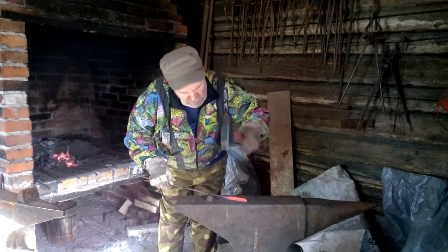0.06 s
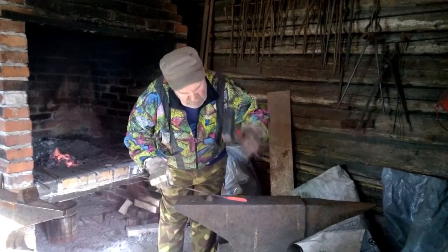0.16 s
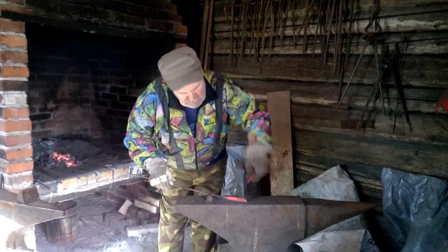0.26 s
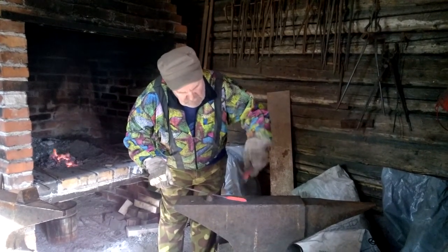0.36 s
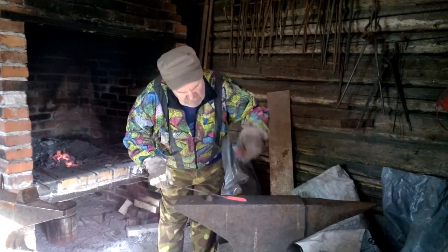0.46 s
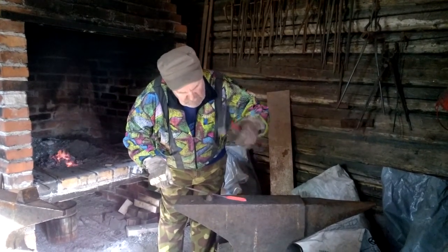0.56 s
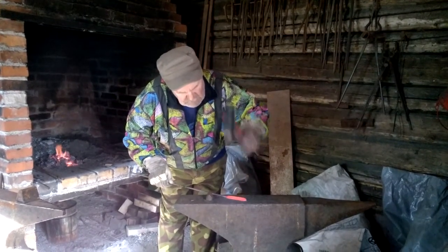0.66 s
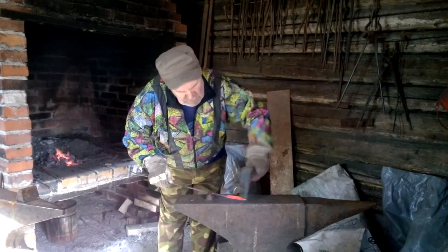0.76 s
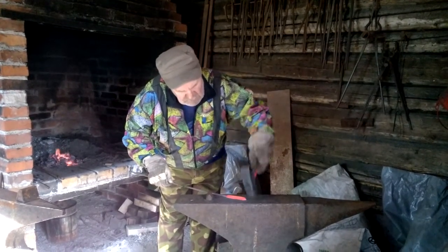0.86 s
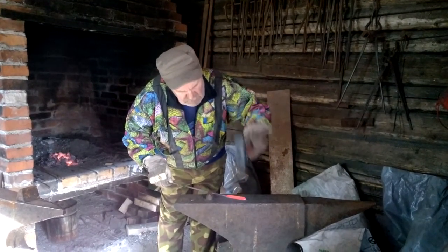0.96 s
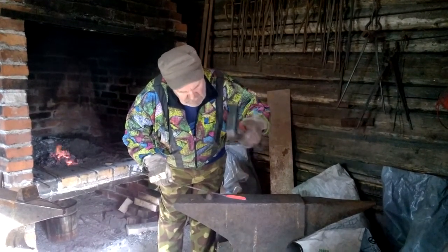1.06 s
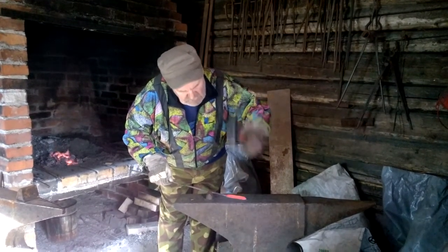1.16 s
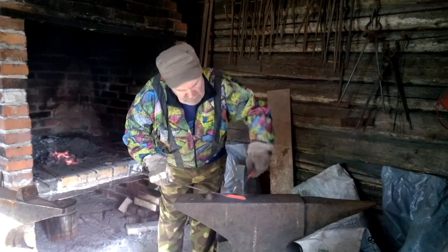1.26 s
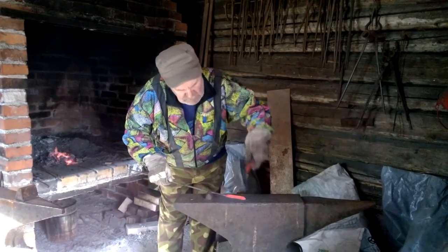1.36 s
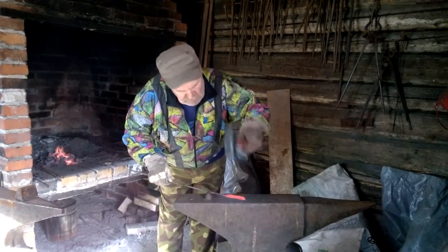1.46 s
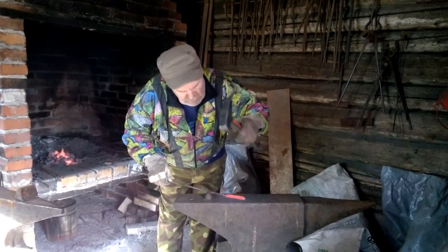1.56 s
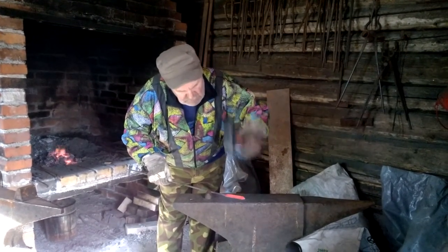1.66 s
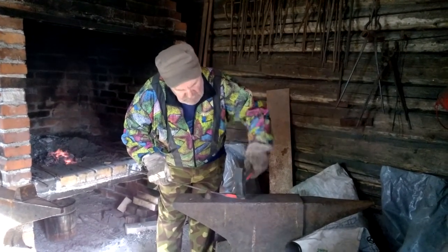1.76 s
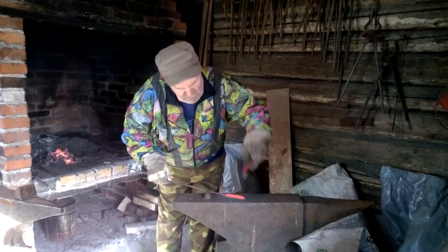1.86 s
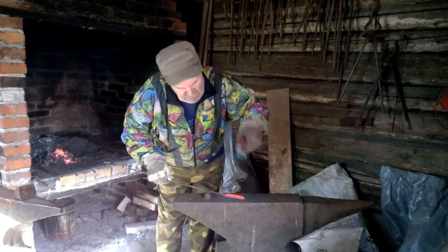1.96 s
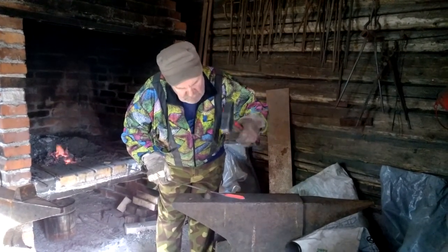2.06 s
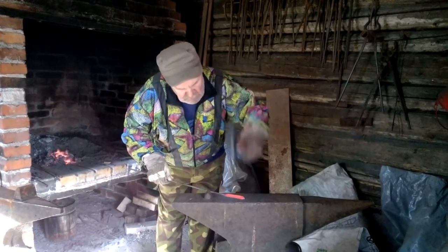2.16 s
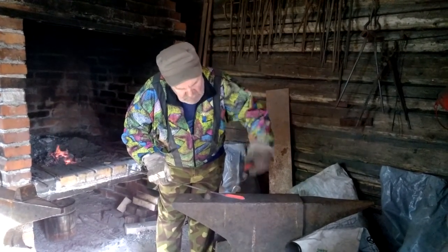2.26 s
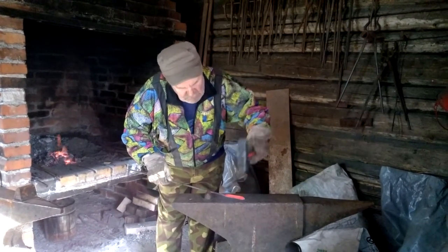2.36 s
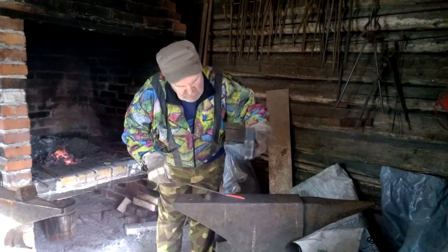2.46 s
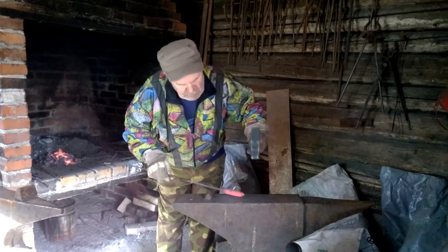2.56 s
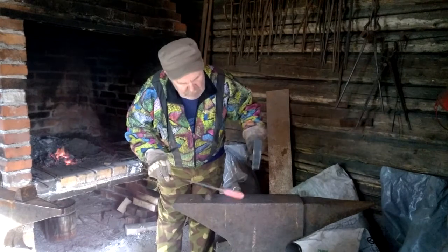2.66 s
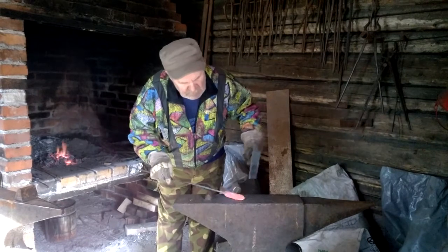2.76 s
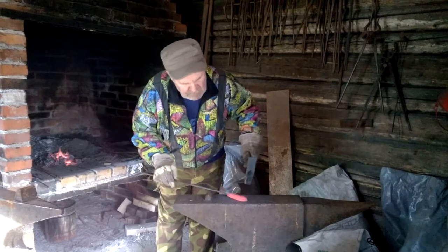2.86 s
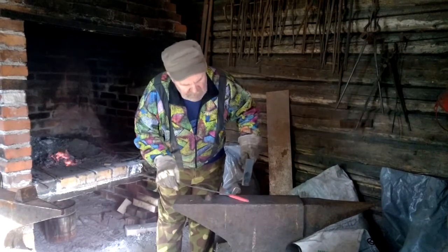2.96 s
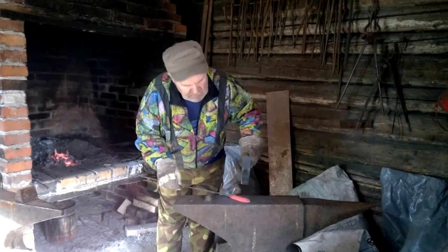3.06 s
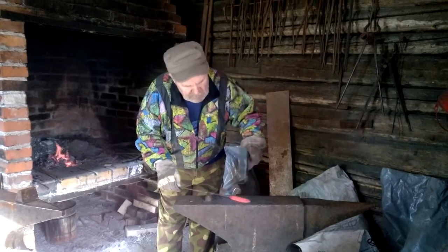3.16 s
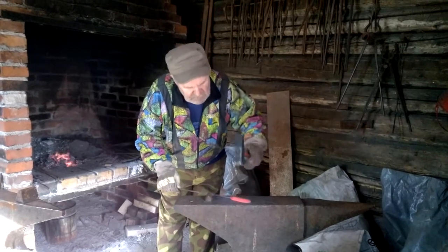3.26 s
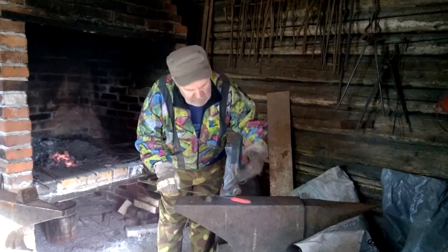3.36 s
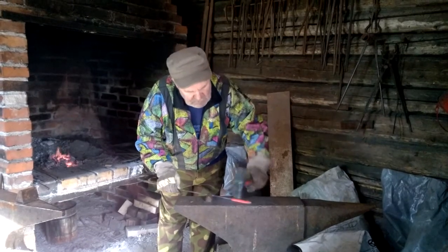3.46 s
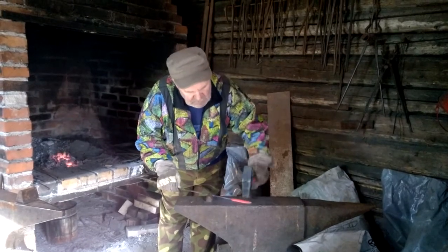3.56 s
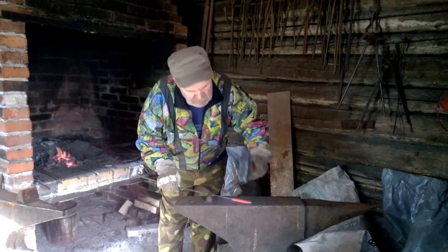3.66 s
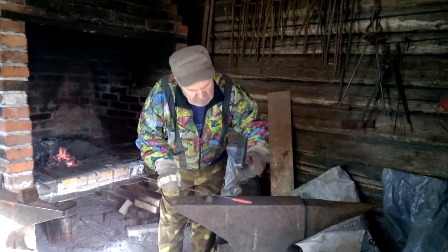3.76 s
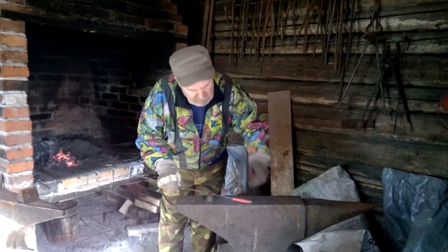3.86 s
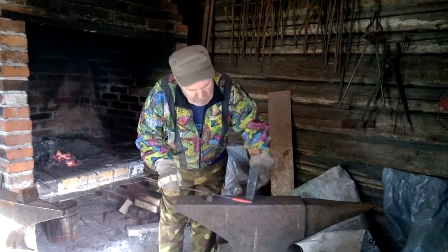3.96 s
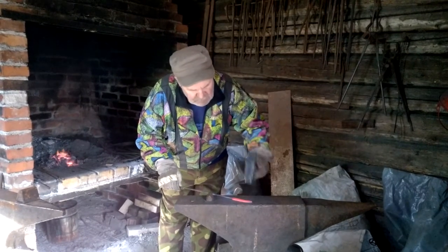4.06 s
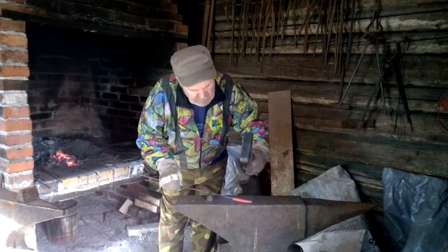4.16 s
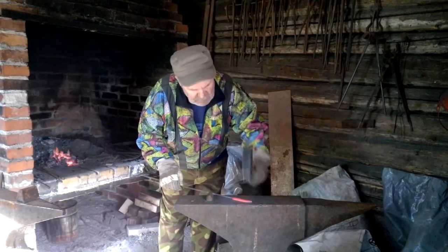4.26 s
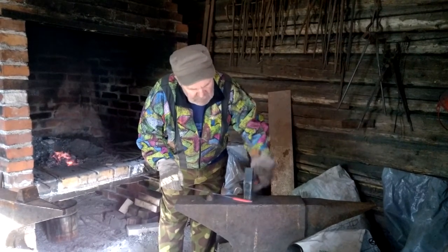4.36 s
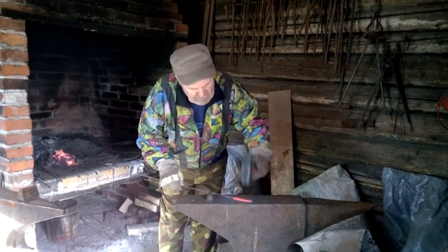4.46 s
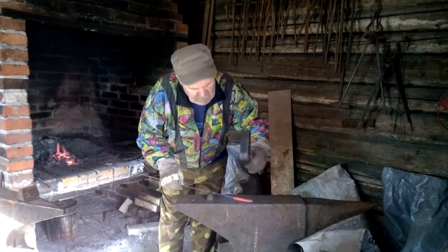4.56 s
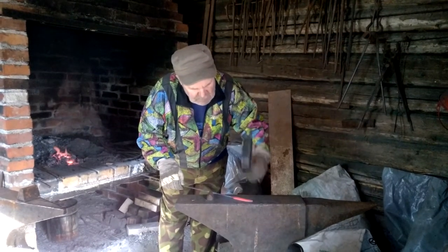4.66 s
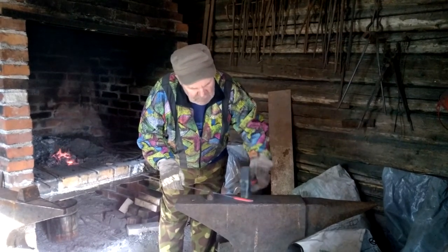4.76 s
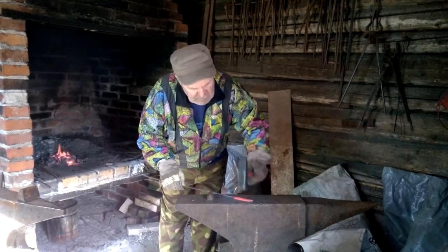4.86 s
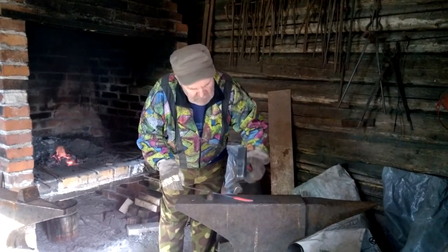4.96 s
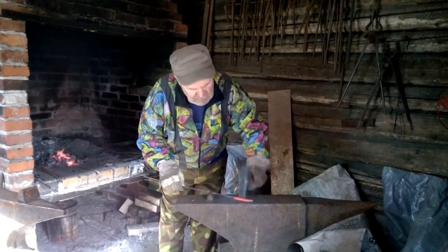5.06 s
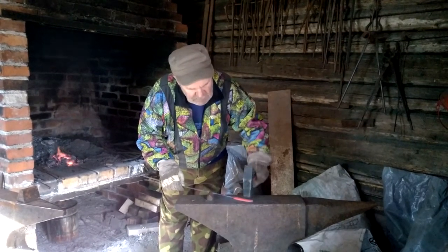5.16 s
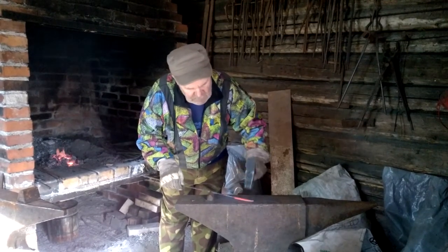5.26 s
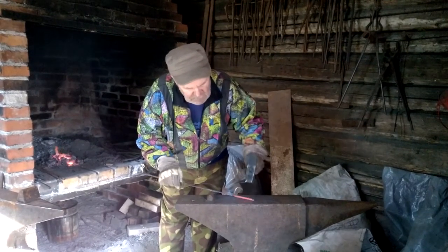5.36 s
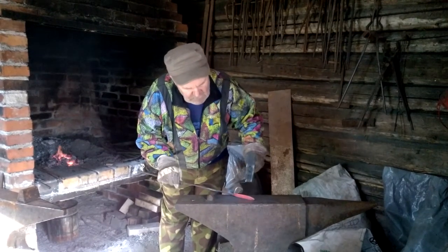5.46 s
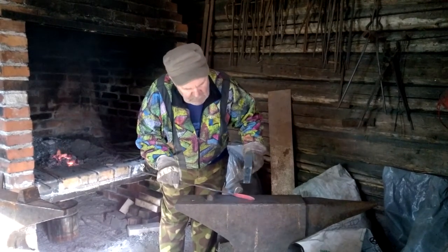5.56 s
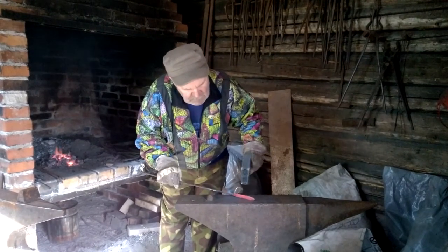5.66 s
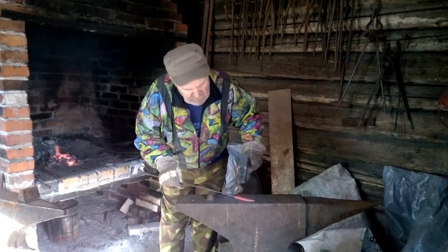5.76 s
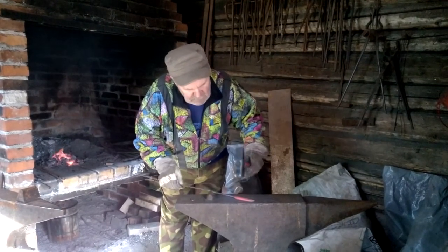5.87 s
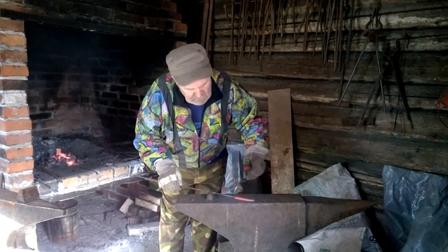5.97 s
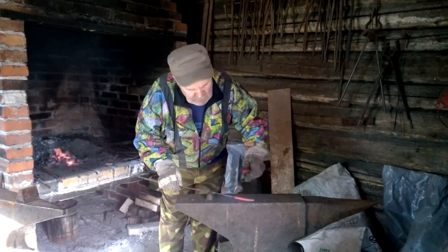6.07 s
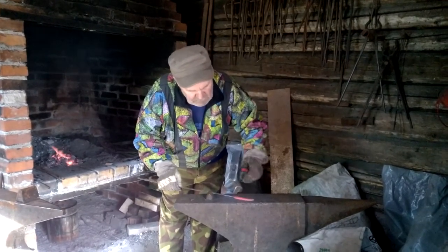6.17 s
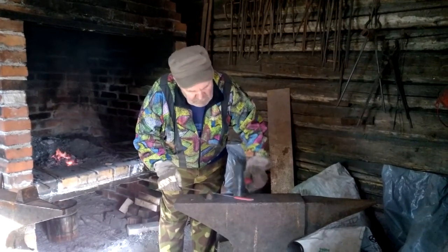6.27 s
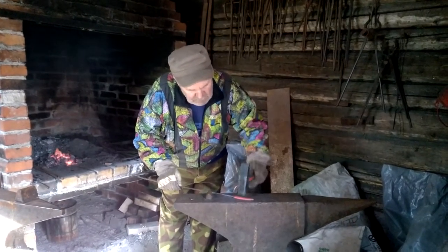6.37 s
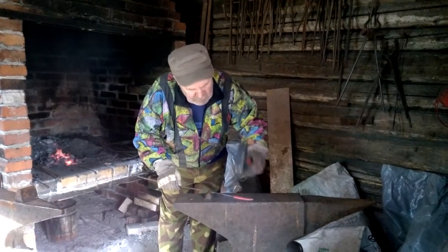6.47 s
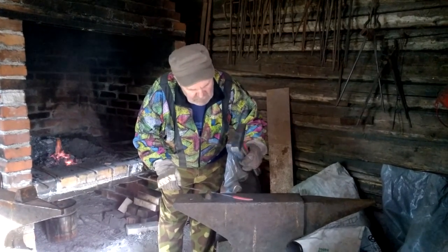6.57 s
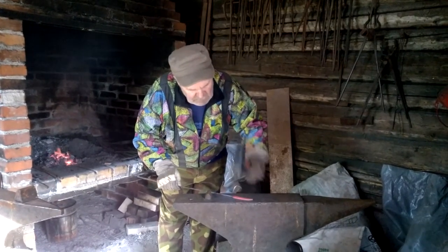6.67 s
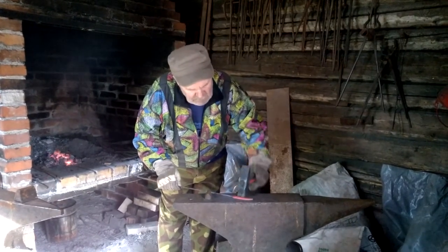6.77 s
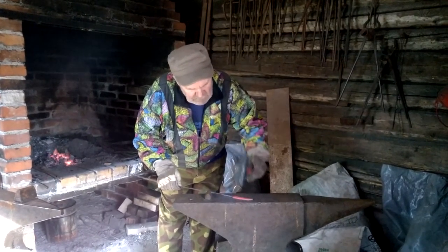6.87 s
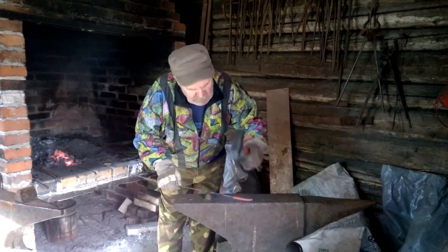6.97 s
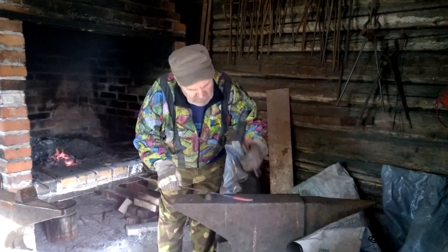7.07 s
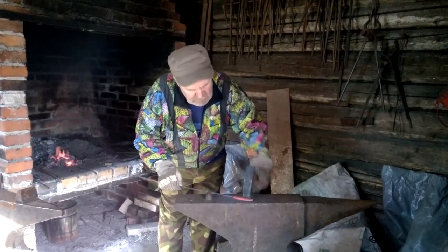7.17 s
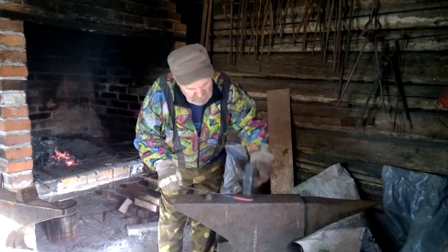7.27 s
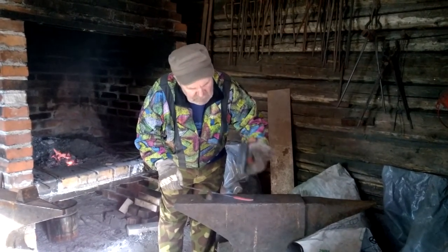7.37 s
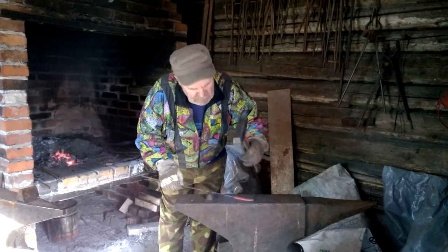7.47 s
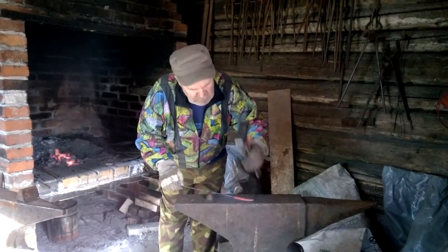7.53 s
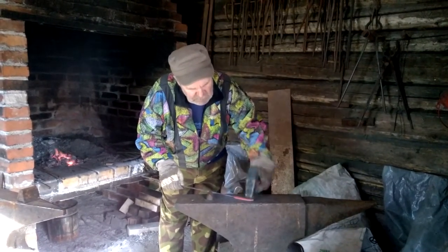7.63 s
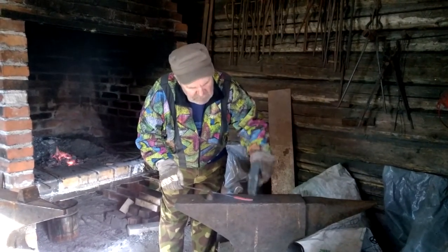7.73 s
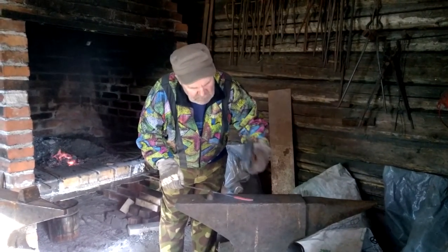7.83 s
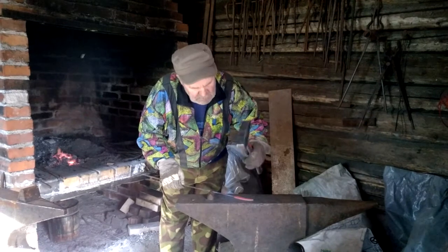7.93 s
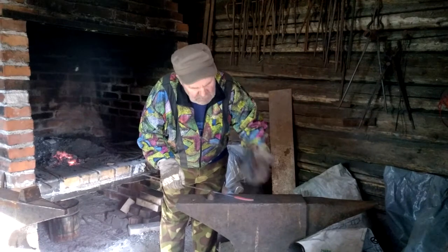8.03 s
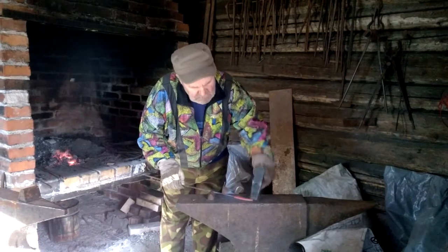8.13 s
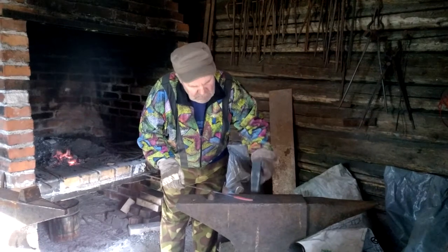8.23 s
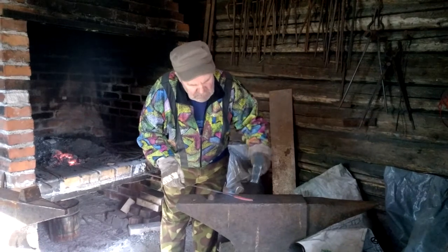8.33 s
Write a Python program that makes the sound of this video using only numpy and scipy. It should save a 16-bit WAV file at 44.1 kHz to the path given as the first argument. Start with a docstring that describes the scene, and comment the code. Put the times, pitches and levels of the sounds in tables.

```python
"""A forge murmurs low in a log-walled smithy, shaped noise with a faint rustle, while a hand hammer
forges hot steel on an anvil. A run of seven blows comes first, and something heavy lands on the floor
during it; then light ticks of metal, a run of five with a bounce onto the bare anvil after its first
blow, one more tick and a run of four. Each blow is a knock, echoing noise, a thud of the stump and the
decaying modes of anvil and hammer head. Two microphone ports hear it all through a limiter."""
import sys
import numpy as np
from scipy import signal
from scipy.fft import rfft, irfft
from scipy.io import wavfile
from scipy.ndimage import uniform_filter1d

SR = 44100
rng = np.random.default_rng(int(sys.argv[2]) if len(sys.argv) > 2 else 0)


def digitize_waveform(pressure):
    """Quantize a signal to 16-bit integers and store it at the path in sys.argv[1].

    Rows of a 2-D input are taken as channels; values are limited to [-1, 1].
    """
    field = np.atleast_2d(pressure).T
    bounded = np.clip(field, -1, 1)
    quanta = np.round(bounded * 32767).astype(np.int16)
    wavfile.write(sys.argv[1], SR, quanta)


N = 370440


def gain_of(db):
    """Turns dB into a gain on amplitude."""
    return 10 ** (np.asarray(db) / 20)


def evened(x):
    """Scales to rms 1."""
    return x / np.sqrt(np.mean(x ** 2) + 1e-20)


def read(points, hz):
    """Reads a table of (f/Hz, value) along log frequency."""
    f, value = np.transpose(points)
    return np.interp(np.log(hz + 1), np.log(f + 1), value)


def add(mix, s, sound):
    """Adds a sound at a time in s; what lies before zero is dropped."""
    at = round(s * SR)
    part = mix[:, max(at, 0):at + sound.shape[1]]
    part += sound[:, max(-at, 0):][:, :part.shape[1]]


# how alike diffuse sound is at the two ports: f/Hz, left-right likeness (0..1)
LIKENESS = [(60, 0.9), (180, 0.95), (550, 0.76), (1650, 0.14), (4970, 0.085), (15000, 0.023)]


def noise(size, colour_db):
    """Noise for two ports, sharing more of its sound in the bass, shaped by a function of Hz; rms 1."""
    hz = np.fft.rfftfreq(size, 1 / SR)
    left, other = rfft(rng.standard_normal((2, size)))
    same = np.clip(read(LIKENESS, hz), 0, 1)
    right = same * left + np.sqrt(1 - same ** 2) * other
    return evened(irfft(np.array([left, right]) * gain_of(colour_db(hz)), size))


# decay of the noisy sounds' tails, shortest in the top treble, before each sound's own stretch: f/Hz, t60/s
TAIL_DECAY = [(60, 0.38), (200, 0.21), (600, 0.28), (2000, 0.24), (5000, 0.18), (9000, 0.19), (12500, 0.13),
              (15500, 0.11)]
# how slowly the echoes fill in: f/Hz, time constant/s
ECHO_BUILD = [(60, 0.033), (300, 0.044), (1500, 0.0023), (6000, 0.0015)]


def echoes(x, stretch, edge_db):
    """Shapes steady noise into the sharp edge of a contact and its echoes, which fill in and die band by band."""
    hz, t, z = signal.stft(x, SR, nperseg=256, noverlap=192)
    fill = 1 - np.exp(-(t + 0.0073) / read(ECHO_BUILD, hz)[:, None])
    t60 = np.maximum(stretch * read(TAIL_DECAY, hz), .02)[:, None]
    # the end of the tail falls quicker than its start
    fade_db = -60 * (t / t60) ** 1.199
    tail = signal.istft(z * fill * gain_of(fade_db), SR, nperseg=256, noverlap=192)[1][:, :x.shape[1]]
    # the direct edge carries little bass and meets both ports alike
    bright = uniform_filter1d(np.diff(x.mean(0), prepend=0), size=3)
    edge = bright * np.exp(-np.arange(x.shape[1]) / SR / 0.0012)
    return tail + gain_of(edge_db) * edge


def ring(hz, db, t60, pan_db, lead, rise, turn):
    """One decaying mode, reaching the two ports with its own balance and phase; turn is its start in cycles."""
    t = np.arange(round(min(1.4, 1.5 * t60) * SR)) / SR
    side = np.array([[.5], [-.5]])
    out = np.zeros((2, round(1.4 * SR)))
    tone = np.sqrt(2) * np.sin(2 * np.pi * (hz * t + turn) + side * lead)
    fade = gain_of(db + side * pan_db - 60 * t / t60)
    add(out, 0, tone * fade * (1 - np.exp(-t / rise)))
    return out


# spectrum of the fire's murmur: f/Hz, relative level/dB per Hz
FORGE_COLOUR = [(15, -32), (25, -1.5), (80, -5.5), (141, -10), (175, -13), (591, -26.5), (1100, -35.5),
                (1560, -28.5), (1790, -53.5), (3820, -38.5), (16000, -60.5)]
FORGE_DB = -58
# how the faint rustle comes and goes: t/s, level/dB
RUSTLE_LEVEL = [(0, -73), (3.301, -85.5), (3.6, -77), (3.749, -68), (3.9, -67.5), (4.002, -83), (8.4, -68)]
# spectrum of the rustle: f/Hz, relative level/dB per Hz
RUSTLE_COLOUR = [(150, -21.5), (330, -2.5), (1000, 6), (3000, -8.5), (6000, -34.5)]


def forge():
    """The fire's low murmur is bass-heavy noise of slowly wandering level; a rustle passes over it."""
    smooth = uniform_filter1d(rng.standard_normal(N), size=2500)
    lumps = evened(uniform_filter1d(smooth, size=2500))
    murmur = gain_of(FORGE_DB + 0.5 * lumps) * noise(N, lambda hz: read(FORGE_COLOUR, hz))
    rustle_db = np.interp(np.arange(N) / SR, *np.transpose(RUSTLE_LEVEL))
    rustle = noise(N, lambda hz: read(RUSTLE_COLOUR, hz) - 40 * (hz > 8000))
    return murmur + gain_of(rustle_db) * rustle


# spectrum of the floor's rumble: f/Hz, relative level/dB per Hz
FLOOR_COLOUR = [(18, -31.5), (30, -20), (81, 1), (193, -13), (240, -16.5), (400, -24), (700, -30.5),
                (1300, -42.5), (1690, -76.5), (2860, -120)]


def bump(db):
    """A heavy landing gives the floorboards a fast-dying low push, and they rumble."""
    t = np.arange(30000) / SR
    push = -np.sin(2 * np.pi * 55 * t) ** 3 * np.exp(-t / 0.028)
    rumble = echoes(noise(30000, lambda hz: read(FLOOR_COLOUR, hz)), stretch=1.8, edge_db=-9.0)
    rumble = rumble * (1 - np.exp(-(t / .004) ** 2))  # soft start
    return gain_of(db + 7.5) * push + gain_of(db + 1.0) * rumble


# spectrum of a light contact: f/Hz, relative level/dB per Hz
TOUCH_COLOUR = [(700, -12), (1200, 0), (2500, 1), (5500, 3), (9000, -6.5), (13500, -7), (15000, -28)]
# modes of the tongs: f/Hz, relative level/dB, t60/s
TONGS_MODES = [(2757, -8, .2), (5150, 0, .07), (6450, 0, .08), (9227, -8, .1)]


def tick(db):
    """A light touch of metal: a small click, the tongs' short ring and the echoes."""
    out = sum(ring(hz, db + ring_db - 5, t60, 0, 0, rise=.001, turn=rng.random())
              for hz, ring_db, t60 in TONGS_MODES)
    click = echoes(noise(11025, lambda hz: read(TOUCH_COLOUR, hz)), stretch=0.87, edge_db=7)
    add(out, 0, gain_of(db - 0.5) * click)
    return out


# modes of the wooden stump: f/Hz, relative level/dB, t60/s
STUMP_MODES = [(66.5, -9.5, 0.23), (309.3, -3.5, 0.28), (359.3, -6, 0.27), (728, -9.5, .3),
               (814, -10, 0.28)]


def stump_thud(force_db):
    """The stump under the anvil thuds in a few low, heavily damped modes."""
    return sum(ring(hz, db - 22.5 + force_db, t60, 0, 0, rise=0.0031, turn=rng.random())
               for hz, db, t60 in STUMP_MODES)


# anvil modes, one list a family that rings together:
# f/Hz, relative level/dB, t60/s, left-right balance/dB, left's phase lead/rad
ANVIL_FAMILIES = [
    [(1542, 4, 1.0, -2.5, -1.0)],
    [(1422, 4, .78, 3, -.2)],
    [(1631.5, 0, .65, -8, -1.5)],
    [(2757, 4, .5, -13, .6)],
    [(2050, 5.5, .2, -1, 1.9), (2061, 2.5, .39, 3, -2.65)],
    [(5341, 4, .245, -7, 0), (3896, -6, .25, 7, -1), (4085, -4, .2, 9, -2.2), (4220, 3, .215, 4, -1.1)],
    [(3598, 5, .2, 3, 1.8), (2955, -2, .27, 0, -2.9), (3538, -6, .2, 8, 2.7)],
    [(5375, 4, .225, -3, .5), (6538, -8, .18, 1, -1.2), (7309, -4, .19, 6, -2.7), (8042, -10, .19, -1, 0),
     (8614, -3, .225, 1, -.2), (8788, -6, .2, 2, -3)],
]
# how each anvil family answers a blow: level/dB, share of the ring (dB per dB), slope along the face
# (dB per step), slope across it (dB per step), further slope on the near side of the middle (dB per step along)
FAMILY_ANSWER = [(-14, 1, 0, 0, 0), (-23, 1, 10, 0, 0), (-27.5, .8, 5, -4, 2), (-28.5, .83, 6, 2, 7),
                 (-17.8, .71, 0, 6.9, 0), (-33.6, 1.17, 0, 14, 0), (-23, .98, 0, 10, 0),
                 (-26.5, 1.2, 2, 2.5, 1)]


def anvil_ring(out, ring_db, along, across, overtone_db):
    """The spot struck sets how strongly each family of anvil modes is driven."""
    families_db = [db + share * ring_db + a * along + b * across + c * min(along, 0)
                   for db, share, a, b, c in FAMILY_ANSWER]
    families_db[3] += overtone_db  # the bright overtone
    for family_db, modes in zip(families_db, ANVIL_FAMILIES):
        turn = rng.random()  # a family sets off in step, so its close pair always beats alike
        for k, (hz, db, *rest) in enumerate(modes):
            # the lesser modes of the larger families vary by chance from blow to blow
            chance_db = 1.5 * rng.standard_normal() * (k > 0 and len(modes) > 2)
            out += ring(hz, db + family_db + chance_db, *rest, rise=0.007, turn=turn)


# modes of the hammer head: f/Hz, relative level/dB, t60/s, balance/dB and lead/rad before each blow's swing
HEAD_MODES = [(11144, 5, .145, -1, 0), (9228, -9, .17, 4, -.9), (9423, -14, .24, 3, -2.1),
              (10323, -12, .23, -4, -2.8), (12840, -14, .15, 3, -2.7), (13018, -12, .16, -4, -.7)]


def head_ring(out, head_db):
    """The hammer head rings high, and turns as it rebounds, which shifts its balance and phase."""
    for hz, db, t60, pan_db, lead in HEAD_MODES:
        chance_db, swing = rng.standard_normal(2)
        out += ring(hz, db + head_db + 1.3 * chance_db, t60, pan_db + 4.0 * swing, lead + swing,
                    rise=0.018, turn=rng.random())


# basic spectrum of the blow's noise: f/Hz, relative level/dB per Hz
BLOW_COLOUR = [(25, -24), (45, -8), (90, 1), (200, -2.5), (345, -4), (900, -6), (1500, -4), (2100, -11.5),
               (2700, -15.5), (3600, -16.5), (7000, -22.5), (10000, -18.5), (13000, -20.5), (16000, -21)]
# tilt added to that spectrum: f/Hz, level/dB, then shares of force, ring and sparkle (dB per dB)
BLOW_TILT = [(150, -18, 2.4, 0.013, -0.15), (707.6, -21.5, 0.64, 0.36, -.1),
             (2930, -17.5, 0.6, 0.38, -0.25), (8584, -17.5, 1.1, 0.12, -.05), (13300, -23, 0.6, 0.1, 0.8)]


def blow_noise(force_db, sparkle_db, ring_db):
    """The crack is noise tinted by force, ring and sparkle, echoing round the room."""
    tilt = [(hz, db + a * force_db + b * ring_db + c * sparkle_db) for hz, db, a, b, c in BLOW_TILT]

    def colour_db(hz):
        return read(BLOW_COLOUR, hz) + read(tilt, hz)

    # noise() evens the level out, so the spectrum's own level is put back
    level = np.sqrt(np.mean(gain_of(colour_db(np.fft.rfftfreq(22050, 1 / SR))) ** 2))
    return gain_of(23.5) * level * echoes(noise(22050, colour_db), stretch=1.109, edge_db=12)


def knock(db):
    """The contact itself is a very short 1850 Hz burst, alike at both ports."""
    t = np.arange(300) / SR
    return gain_of(db) * np.sin(2 * np.pi * 1850 * t)[None] * np.exp(-t / 0.0012)


KNOCK_DB, KNOCK_FORCE, KNOCK_RING = -3.73, 0.81, .38  # level/dB, then shares of force and ring (dB per dB)


def blow(force_db, sparkle_db, ring_db, along, across, head_db, overtone_db, sharp_db=0):
    """Hammer, steel, anvil and stump sound together: thud, modes, echoing noise and knock."""
    out = stump_thud(force_db)
    anvil_ring(out, ring_db, along, across, overtone_db)
    head_ring(out, head_db)
    add(out, 0, blow_noise(force_db, sparkle_db, ring_db))
    add(out, 0, knock(KNOCK_DB + KNOCK_FORCE * force_db + KNOCK_RING * ring_db + sharp_db))
    return out


# something heavy lands on the floor: t/s, relative level/dB
FLOOR_BUMPS = [(1.928, -23.5), (1.9545, -20.5)]
# light touches of metal: t/s, relative level/dB
METAL_TICKS = [(3.1878, -42.5), (3.201, -50), (3.396, -67), (3.595, -77), (3.9597, -30.5), (6.246, -72.5)]
# the hammer bounces onto the bare anvil: columns as in HAMMER_BLOWS, then extra sharpness of the knock/dB
HAMMER_BOUNCES = [(4.0095, -23, -15, -13, -.6, -.4, -57.5, -8, 12)]
# hammer blows: t/s, force/dB, treble sparkle/dB, ring passed through the steel into the anvil/dB,
# spot struck along the face and across it (steps from the middle), ring of the hammer head/dB,
# extra level of the anvil's bright overtone, its fourth family/dB
HAMMER_BLOWS = [(-0.2, 1.5, -4, -7, -0.029, 0.65, -29, 1), (0.2846, 0, 2, -1.5, -1.3, .15, -36.5, -3),
                (0.7725, 0.5, 2.5, 2.5, -1.48, 0.09, -17.5, -3), (1.2581, 0.5, 3, 1.5, -0.1, 0.62, -24, 2),
                (1.744, -1, -7.5, 2.5, -0.3, 0.52, -14.5, 1), (2.2373, 0, -5, 0.5, .05, 0.24, -29, 0),
                (2.726, 0, -7.5, 3, -0.58, 0.52, -31, -1), (3.9622, -1, 4.5, -20, 0.2, 0.088, -42, 3.5),
                (4.4007, -0.5, 8, -12, 0.46, -0.98, -41.5, -7), (4.8166, 0, 12, -1, 0.47, -0.43, -27, -3.5),
                (5.2362, -1, 9.5, -1.5, .7, -0.23, -24, 2), (5.5754, -1, 4, -7.5, -0.12, 0.35, -26, 6),
                (6.7718, -2, 2.5, -24, 1.46, 1.07, -31, 2), (7.2134, 0, 6, -2, 0.56, 0.19, -20.5, 3),
                (7.6732, -0.5, 7.5, 2, .65, -0.34, -18.5, 1),
                (8.1318, -1.5, 0.5, 2, 0.48, -0.29, -14.5, 1.5)]


def scene():
    """The forge lies underneath, and each table's contacts are laid over it at their times."""
    mix = forge()
    for table, source in ((FLOOR_BUMPS, bump), (METAL_TICKS, tick),
                          (HAMMER_BOUNCES, blow), (HAMMER_BLOWS, blow)):
        for s, *row in table:
            add(mix, s, source(*row))
    return mix


def record(dry):
    """A limiter turns loud sound down and lets go steadily; then peaks clip and the top is band-limited."""
    threshold_db, release_db_per_s, edge_hz = -9.5, 190.0, 15900
    power = signal.lfilter([.02], [1, -.98], (dry ** 2).mean(0))
    power_db = 10 * np.log10(power + 1e-12)
    fall = np.arange(N) * release_db_per_s / SR
    held_db = np.maximum.accumulate(power_db + fall) - fall  # jumps up with a peak, then slides down
    over_db = np.maximum(held_db - threshold_db, 0)
    cut_db = 0.61 * signal.lfilter([.03], [1, -.97], over_db)
    limited = np.clip(dry / gain_of(cut_db), -1, 1)
    low_pass = signal.firwin(301, edge_hz, window=("kaiser", 12), fs=SR)
    return signal.oaconvolve(limited, low_pass[None], "same")


dry = scene()
out = record(dry)
digitize_waveform(out)
```